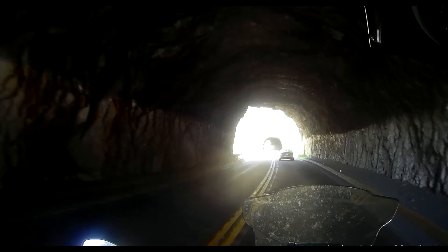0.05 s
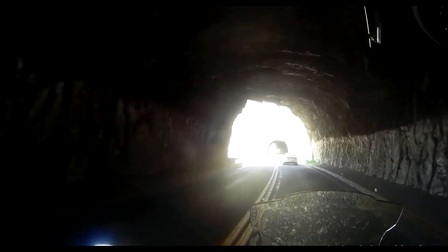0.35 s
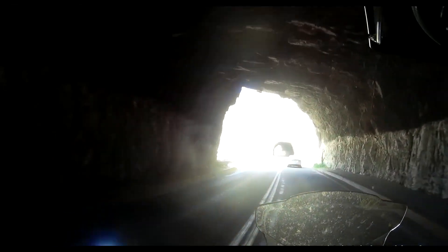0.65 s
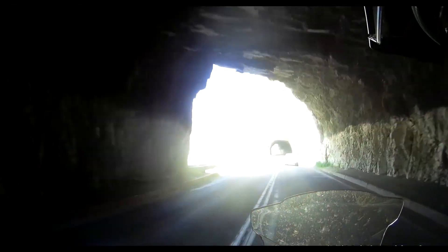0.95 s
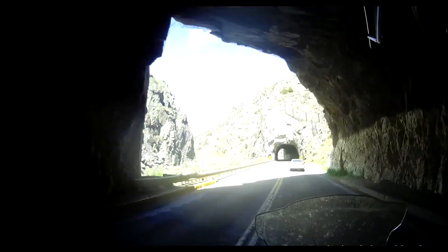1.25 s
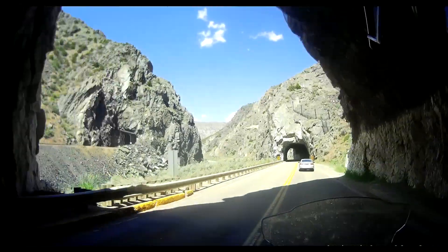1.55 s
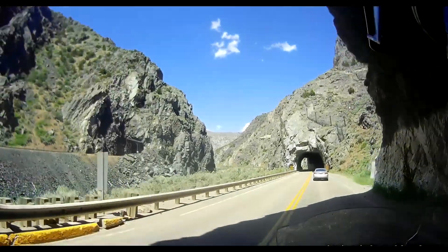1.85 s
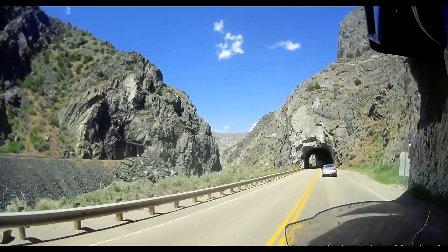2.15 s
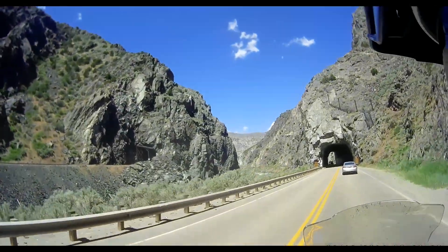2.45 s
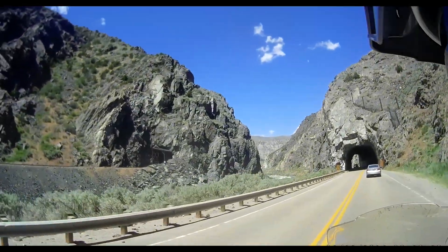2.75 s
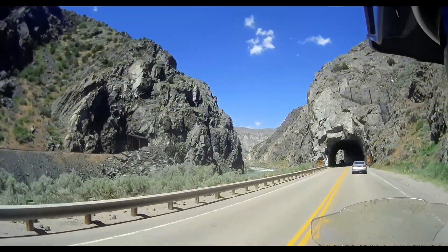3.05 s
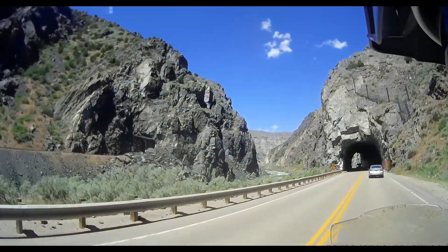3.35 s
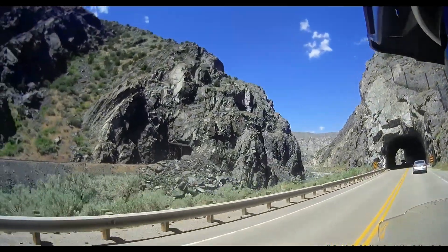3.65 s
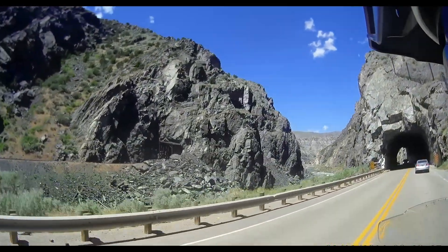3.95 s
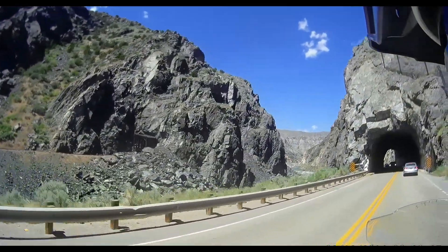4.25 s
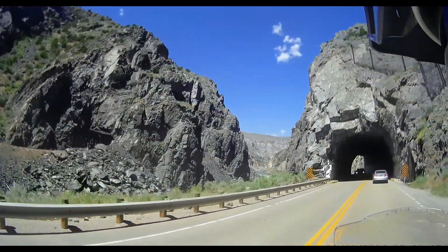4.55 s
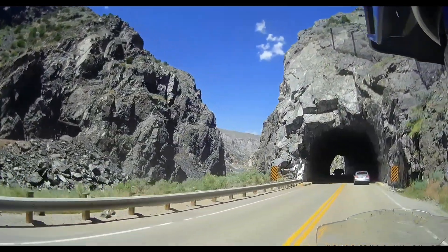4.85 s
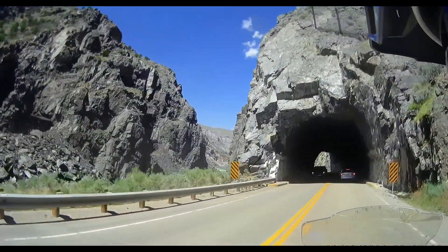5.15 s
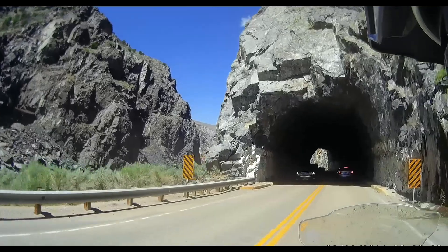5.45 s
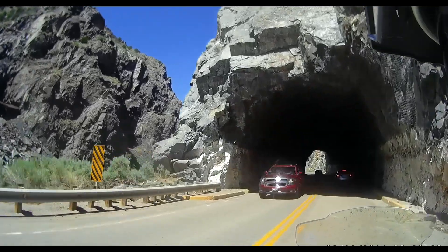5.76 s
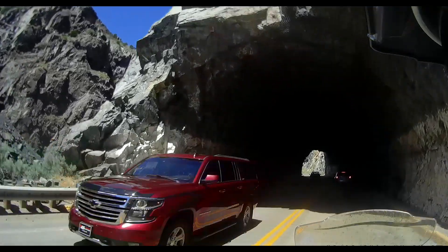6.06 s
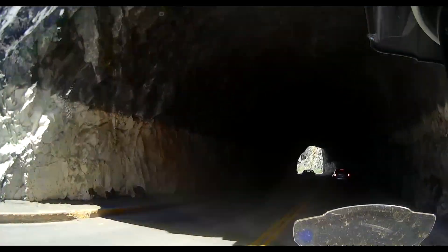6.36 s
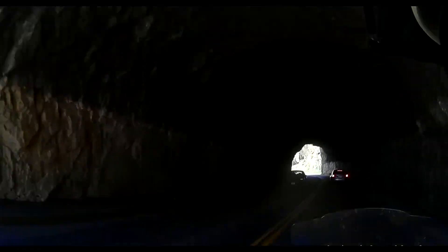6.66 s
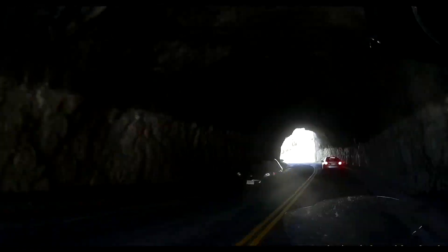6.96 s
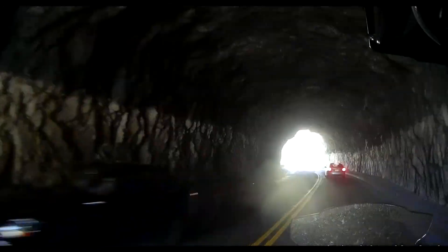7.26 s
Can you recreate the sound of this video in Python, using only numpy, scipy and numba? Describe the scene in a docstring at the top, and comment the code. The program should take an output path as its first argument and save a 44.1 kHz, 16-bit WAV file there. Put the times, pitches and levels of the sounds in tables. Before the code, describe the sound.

Strong wind buffets a microphone on a motorcycle travelling a canyon road between two rock tunnels, for about seven and a half seconds. Low, steady tyre and engine rumble lies beneath it. In the first second, booming gusts alternate with brief lulls, under an airy hiss and a very faint high whistle from about 0.5 to 1 second. From 1.2 to 2.4 seconds the wind flutters raggedly, with quick tearing slaps. It eases slightly, then gusts hard from 3 to 4.5 seconds, with a trace of whistle near 3.1. Sharp slaps of air stand out around 4.5, 5.3 and 6.1 seconds, the last thrown by an oncoming car. The hiss repeatedly builds and breaks off, notably between 6 and 6.6 seconds. The hardest blasts overload the microphone and briefly choke the hiss. After a short lull, another gust hits just after 7 seconds.

```python
"""A canyon road between two rock tunnels, heard from a microphone riding on a motorcycle.
Turbulent eddies of all sizes buffet the microphone in gusts and lulls, and single vortices slap
across its port. Air shearing round the housing hisses in surges and draws a faint whistle from an edge.
Tyre and engine rumble lie beneath. The strongest pressure swings overload the input and pull
its gain down, which chokes the hiss."""
import sys
import numpy as np
from scipy import signal
from scipy.fft import rfft, irfft, next_fast_len
from scipy.io import wavfile
from scipy.ndimage import map_coordinates
from numba import njit

SR = 44100
rng = np.random.default_rng(int(sys.argv[2]) if len(sys.argv) > 2 else 0)


def dump(signal):
    """Clip the signal to [-1, 1] and save it as 16-bit WAV at the path in sys.argv[1]."""
    limited = np.clip(np.atleast_2d(signal).T, -1, 1)
    pcm = np.round(limited * 32767).astype(np.int16)
    wavfile.write(sys.argv[1], SR, pcm)


N = 322812

# Noise spectra. Each row: frequency in Hz, relative spectral density in dB.
ROAD_SPECTRUM = [(30, 9), (100, 8), (250, -13), (500, -6.5), (1000, -30), (2800, -47), (4000, -57),
                 (12000, -50)]
FIZZ_SPECTRUM = [(300, 3), (2000, 1), (5600, -11), (11000, -7), (15000, -22)]
HISS_SPECTRUM = [(100, -24), (400, 6), (850, -3.5), (1200, -1.5), (1600, -7), (2200, -9), (2900, -14),
                 (3600, -17), (5200, -19.5), (5700, -22), (7000, -23), (8000, -28), (12500, -30.5),
                 (14500, -44)]
BUFFET_SPECTRUM = [(5, -7), (14, -3.5), (24, 0), (36, -1.5), (55, -5.5), (80, -15.5), (140, -26),
                   (600, -110)]  # the largest eddies
SWIRL_SPECTRUM = [(30, -15.5), (65, 3.5), (110, -0.5), (170, -5), (240, -11), (350, -24.5), (700, -36.5),
                  (2000, -82)]  # middle-sized, booming eddies
FLUTTER_SPECTRUM = [(90, -32), (200, 2.5), (280, 0), (380, -4.5), (550, -15), (800, -24), (1500, -36.5),
                    (4000, -75)]  # small, ragged eddies
RASP_SPECTRUM = [(400, 2), (1100, -2), (2000, -6), (3000, -8), (4000, -22), (7000, -25), (13000, -34)]  # eddies tearing at the port
TEAR_SPECTRUM = [(200, 8), (420, 10), (650, 11), (1000, -15), (1400, -12.5), (3000, -21), (5000, -35),
                 (10000, -50)]
CRACK_SPECTRUM = [(400, -14), (750, 0), (1050, 2), (1500, -14), (2800, -18), (5000, -32.5), (10000, -40)]

# Edge tones of the housing. Each row: onset in seconds, hold in seconds, pitch in Hz, level in dB.
EDGE_TONES = [(0.446, 0.61, 4640, -64), (3.065, .045, 4660, -57), (3.09, 0.0175, 6750, -61)]
# Air cavities of the housing. Each row: resonant frequency in Hz, width in Hz, lift in dB.
CAVITIES = [(1210, 32, 2), (2890, 150, 4), (4100, 350, -2), (4510, 380, 2), (6650, 350, 1), (9800, 1200, 3)]
# Air rushing round the housing, strongest in the first tunnel and at the mouth of the second.
# Each row: time in seconds, relative level in dB.
AIR_RUSH = [(0, -43.5), (.17, -54), (.3, -46), (.62, -43), (1.1, -45), (1.65, -51.5), (2.1, -50),
            (2.4, -54.5), (2.85, -54), (3.06, -46), (3.27, -52), (3.55, -52), (4.25, -56.5), (5.05, -52.5),
            (5.3, -49), (5.7, -53), (6.05, -48.5), (6.72, -56.5), (7.32, -50)]
# Hiss that builds and breaks off. Each row: break in seconds, build time in seconds, relative level in dB.
HISS_SURGES = [(.07, 0.033, -56), (1.57, 0.22, -47.5), (2.03, 0.42, -51.5), (3.17, 0.16, -47),
               (3.83, 0.52, -49.5), (4.129, 0.31, -49.5), (4.49, 0.28, -50), (4.78, 0.34, -52),
               (4.919, 0.2, -49.5), (6.11, 0.29, -48), (6.383, 0.29, -45.5), (6.555, 0.12, -48.5),
               (7.15, 0.3, -55)]
# Abrupt drops of the hiss. Each row: onset in seconds, hold in seconds, depth in dB.
HISS_DIPS = [(1.1, .025, 4), (1.577, 0.016, 10), (2.03, 0.024, 7), (2.31, .02, 2), (2.35, .014, 11),
             (3.19, .02, 6), (3.267, 0.049, 2.5), (3.845, 0.026, 3), (4.125, 0.012, 11), (4.514, 0.052, 2),
             (4.777, 0.0071, 16), (4.94, 0.031, 5), (5.04, .018, 6), (5.148, .022, 4.5), (5.233, .005, 13),
             (5.355, .04, 1.5), (5.69, 0.039, 3), (6.385, 0.022, 5), (6.57, 0.018, 4), (6.677, 0.037, 5),
             (6.799, 0.014, 12)]
# Moments of smooth flow. Each row: onset in seconds, hold in seconds, relative depth in dB.
FLOW_LULLS = [(0.15, 0.11, 13.5), (0.442, 0.21, 6), (0.775, 0.026, 10), (0.914, 0.025, 18),
              (1.122, 0.057, 13.5), (1.525, .025, 7.5), (2.61, 0.036, 1), (2.881, 0.08, 9.5),
              (4.237, 0.065, 7), (4.523, 0.16, 2), (4.807, 0.059, 5), (5.004, 0.066, 8.5),
              (5.16, 0.072, 12.5), (5.737, 0.05, 6), (6.138, 0.027, 5.5), (6.705, 0.09, 6.5),
              (6.899, 0.12, 9.5)]
# Gusts of churned air. Each row: onset in seconds, hold in seconds, relative flutter and boom in dB.
AIR_GUSTS = [(0.042, 0.089, -27, -18.5), (0.318, 0.09, -20, -19), (0.689, 0.076, -20, -22),
             (0.824, 0.067, -29, -16), (1.183, 0.21, -20, -19.5), (1.43, 0.025, -31, -40),
             (1.556, 0.088, -31, -21), (1.684, 0.02, -22, -17), (1.85, 0.13, -23.5, -38),
             (2.07, 0.058, -24.5, -37), (2.139, 0.06, -21, -23), (2.243, 0.029, -22.5, -35),
             (2.335, 0.1, -25, -23), (2.712, 0.11, -34, -25), (2.976, 0.29, -27, -21),
             (3.317, 0.054, -18.5, -20), (3.398, 0.17, -19.5, -18), (3.598, 0.03, -27, -17.5),
             (3.773, 0.12, -22, -21.5), (3.942, 0.12, -29, -21.5), (4.057, 0.16, -25, -22.5),
             (4.415, 0.09, -24.5, -17), (4.74, 0.032, -29, -25), (4.867, 0.046, -26, -24.5),
             (5.104, 0.038, -30, -20), (5.285, 0.026, -28, -22), (5.82, 0.11, -28, -20.5),
             (5.913, 0.043, -20, -17), (5.99, 0.1, -26, -18), (6.246, 0.15, -21.5, -21),
             (6.37, 0.1, -43, -38), (6.467, 0.077, -24, -19), (6.595, 0.029, -21, -34),
             (7.048, 0.21, -18, -18.5)]
# Vortices that strike the port, the one at 6.1 s thrown by an oncoming car. Each row: time in seconds,
# swing level in dB, swing frequency in Hz, crossing time in seconds, level of the tearing edge in dB.
VORTICES = [(.062, -11, 198, 0.0067, -29), (.104, -16, 300, .004, -28), (.351, -12, 130.8, .011, -40),
            (.392, -19, 269, 0.0055, -30), (.746, -18, 388, 0.0036, -28), (.83, -10, 255, .0098, -34),
            (1.024, -18, 380, 0.0045, -23), (1.086, -10.5, 348.4, .0035, -16.5),
            (1.292, -13, 278.6, 0.0046, -40), (1.381, -14.5, 328, 0.0052, -34),
            (1.562, -12.5, 329, 0.0039, -17), (1.619, -10.5, 261, .005, -27), (1.702, -9, 276.6, .005, -24),
            (1.79, -19.5, 433, 0.0044, -29), (1.848, -13.5, 428, 0.0065, -29),
            (1.908, -21, 320, 0.0045, -23), (2.019, -12, 292.6, 0.0086, -19.5),
            (2.271, -11, 303, 0.0034, -25), (2.375, -12.5, 298.5, 0.0034, -22),
            (2.753, -13.5, 303, 0.0036, -41), (3.112, -12, 370, 0.0045, -31),
            (3.148, -8.5, 269.3, 0.0073, -21), (3.162, -8.5, 342.2, .0064, -22),
            (3.22, -20, 277, 0.0022, -17), (3.323, -7.5, 233.2, 0.0057, -22), (3.392, -11, 347, .004, -29),
            (3.457, -15, 423, 0.0054, -28), (3.482, -10.5, 350.4, 0.0037, -24),
            (3.537, -11, 319.3, 0.0062, -23), (3.607, -6, 260.5, 0.0047, -27), (3.782, -9, 267, .009, -26),
            (3.825, -9.5, 337.5, 0.0057, -21), (3.947, -6.5, 268, 0.0087, -29),
            (4.0, -17, 403, 0.0036, -24), (4.078, -18, 359, 0.0035, -27), (4.11, -18, 330, 0.0043, -23),
            (4.428, -8, 312, 0.0033, -26), (4.443, -12, 261, .006, -21), (4.466, -7.5, 269, 0.0052, -21),
            (4.477, -2.5, 119.5, 0.0084, -21), (4.525, -20, 448, 0.004, -26),
            (4.868, -10.5, 407, 0.0035, -31), (5.342, 1.5, 199.6, 0.0051, -25), (5.4, -9, 273, .003, -23),
            (5.444, -16, 380, .004, -25), (5.493, -3.5, 138.7, 0.011, -26),
            (5.843, -10.5, 238, 0.0084, -40), (6.094, -2.5, 318, 0.0099, -26),
            (6.294, -5.5, 255.5, .0061, -24), (6.329, -12, 277.4, .005, -29),
            (6.523, -10.5, 372.7, .004, -26), (6.543, -9.5, 305.5, .0048, -24),
            (6.656, -11, 301, .004, -25), (6.786, -11, 299.7, 0.003, -25),
            (7.127, -8.5, 269, 0.0045, -18.5), (7.184, -16, 333, 0.0062, -34)]


def amp(db):
    """Amplitude ratio of a level in decibels."""
    return 10 ** (np.asarray(db) / 20)


def unit_rms(x):
    """The signal scaled to rms 1."""
    return x / np.sqrt(np.mean(x ** 2) + 1e-20)


def wobble(rate):
    """A smooth random curve through rate knots a second."""
    return map_coordinates(rng.standard_normal(N // 8), [np.arange(N) * rate / SR], mode="wrap")


def swell(onset_s, hold_s, rise_s, fall_s):
    """A trapezoidal envelope that reaches 1 at the onset, holds and falls."""
    t = np.arange(N) / SR - onset_s
    return np.clip(np.minimum(1 + t / rise_s, 1 + (hold_s - t) / fall_s), 0, 1)


def filtered(x, response):
    """Linear filtering: the spectrum is multiplied by a frequency response."""
    size = next_fast_len(N + SR // 2)
    return irfft(rfft(x, size) * response(np.fft.rfftfreq(size, 1 / SR)), size)[:N]


def noise(spectrum):
    """White noise filtered to the given spectrum, at rms 1."""
    knots_hz, db = np.transpose(spectrum)
    white = rng.standard_normal(N)
    return unit_rms(filtered(white, lambda hz: amp(np.interp(np.log(hz + 1), np.log(knots_hz), db))))


def steadied(x, span_s):
    """Division by the running rms removes swells longer than span_s."""
    window = np.hanning(max(int(span_s * SR), 3))
    power = signal.fftconvolve(x ** 2, window / window.sum(), "same")
    return x / np.sqrt(np.abs(power) + 1e-9)


def road_rumble():
    """Tyres and engine radiate steady noise, mostly at low frequencies."""
    return amp(-42) * noise(ROAD_SPECTRUM)


def edge_whistle(width_hz, waver_hz):
    """Edge tone: fast air makes an edge of the housing sing in a narrow, wavering band of noise."""
    t = np.arange(N) / SR
    drift_cycles = np.cumsum(waver_hz * wobble(14)) / SR
    breath = unit_rms(wobble(width_hz)) + 1j * unit_rms(wobble(width_hz))
    whistle = np.zeros(N)
    for onset, hold, hz, db in EDGE_TONES:
        tone = np.real(breath * np.exp(2j * np.pi * (hz * t + drift_cycles)))
        whistle += amp(db) * swell(onset, hold, rise_s=0.14, fall_s=0.03) * tone
    return whistle


def cavity_response(hz):
    """Resonance: each cavity of the housing lifts a band about its natural frequency."""
    return amp(sum(db / (1 + (2 * (hz - centre) / width) ** 2) for centre, width, db in CAVITIES))


def hiss_flicker(rate, build_s):
    """The hiss flickers in a random sawtooth, building slowly and dropping abruptly."""
    drops = 1. * (rng.random(N) < rate / SR)  # on average rate times a second
    teeth = signal.lfilter([1], [1, -np.exp(-1 / (build_s * SR))], drops[::-1])[::-1]
    return unit_rms(teeth - teeth.mean())


def shear_hiss(turbulence):
    """Air shearing round the housing makes broadband noise; rush and surges add in power."""
    air = unit_rms(filtered(noise(HISS_SPECTRUM), cavity_response))
    flicker_db = 0.9 * turbulence + 1.22 * wobble(260) + 0.9 * hiss_flicker(rate=69, build_s=0.018)
    flicker = steadied(amp(flicker_db), span_s=0.16)
    rush = amp(np.interp(np.arange(N) / SR, *np.transpose(AIR_RUSH)))
    surges = sum(amp(db) * swell(at, 0, build, fall_s=0.008) for at, build, db in HISS_SURGES)
    dip_db = sum(db * swell(onset, hold, 0.0096, 0.0096) for onset, hold, db in HISS_DIPS)
    return amp(11.5 - dip_db) * np.hypot(rush, surges) * flicker * air


def gusts():
    """Gusts stir small and larger eddies: two envelopes, each following the strongest gust present."""
    envelopes = [amp([[flutter_db], [boom_db]]) * swell(onset, hold, rise_s=0.013, fall_s=0.025)
                 for onset, hold, flutter_db, boom_db in AIR_GUSTS]
    return np.max(envelopes, axis=0)


def eddies(spectrum, turbulence, burst_db, span_s):
    """Intermittency: turbulence bunches the pressure of one size of eddy into bursts."""
    return steadied(noise(spectrum) * amp(burst_db * turbulence), span_s)


def buffeting(turbulence):
    """Passing eddies make the pressure fluctuate; the larger the eddy, the lower its frequency."""
    flutter_gust, boom_gust = gusts()
    calm_db = sum(db * swell(onset, hold, 0.012, 0.012) for onset, hold, db in FLOW_LULLS)

    def strength(gust, steady_db, gust_db, lull_share):
        """A steady part, which sinks in the lulls, adds in power to the gusts."""
        return np.hypot(amp(steady_db - lull_share * calm_db), amp(gust_db) * gust)

    buffet = strength(boom_gust, steady_db=-10.5, gust_db=-19, lull_share=0.31)
    swirl = strength(boom_gust, steady_db=-14, gust_db=6.5, lull_share=0.91)
    flutter = strength(flutter_gust, steady_db=-29.5, gust_db=-4.5, lull_share=0.91)
    rasp = strength(flutter_gust, steady_db=-46.5, gust_db=-23.5, lull_share=0.98)
    return (buffet * eddies(BUFFET_SPECTRUM, turbulence, burst_db=1, span_s=0.173)
            + swirl * eddies(SWIRL_SPECTRUM, turbulence, burst_db=5, span_s=0.15)
            + flutter * eddies(FLUTTER_SPECTRUM, turbulence, burst_db=3, span_s=0.075)
            + rasp * eddies(RASP_SPECTRUM, turbulence, burst_db=2.5, span_s=0.073))


def vortex_slaps(size_spread, crackle_db, raggedness):
    """A vortex crossing the port gives a pressure transient with a tearing edge; the strongest crack."""
    t = np.arange(-SR // 20, SR // 20) / SR
    swings, edges, cracks = np.zeros((3, N + SR))
    draws = rng.standard_normal(size=(len(VORTICES), 48))
    for (at, db, swing_hz, crossing_s, tear_db), (size, phase, *jitter) in zip(VORTICES, draws):
        width_s = crossing_s * np.exp(size_spread * size)  # a bigger vortex takes longer to cross
        core = 1 / (1 + (t / width_s) ** 2) ** 2
        waver = np.interp(t, np.linspace(t[0], t[-1], len(jitter)), jitter)
        cycles = np.cumsum(swing_hz * (1 + raggedness * waver)) / SR
        start = max(round(at * SR) - len(t) // 2, 0)
        passage = slice(start, start + len(t))
        swings[passage] += amp(db) * core * np.sin(2 * np.pi * (cycles + phase))
        edges[passage] += amp(tear_db) * core
        cracks[passage] += amp(-24 + 1.67 * db) * core  # the crack grows faster than the swing
    tearing = steadied(noise(TEAR_SPECTRUM) * amp(crackle_db * wobble(900)), span_s=0.01)
    cracking = steadied(noise(CRACK_SPECTRUM) * amp(crackle_db * wobble(900)), span_s=0.0089)
    return swings[:N] + edges[:N] * tearing + cracks[:N] * cracking


def scene():
    """Superposition: wind and road noise add at the microphone; one turbulence drives eddies and hiss."""
    turbulence = unit_rms(0.6 * wobble(24) + wobble(65) + 0.47 * wobble(150))
    turbulence = np.minimum(turbulence, 1.3)  # bursts level off, troughs go deep
    pressure = (buffeting(turbulence)
                + vortex_slaps(size_spread=0.12, crackle_db=4.5, raggedness=0.222)
                + shear_hiss(turbulence)
                + edge_whistle(width_hz=180, waver_hz=30)
                + road_rumble())
    return pressure[None]


@njit
def follow(x, attack_s, release_s):
    """A first-order lag with separate time constants for rise and fall."""
    envelope = np.zeros(len(x))
    for i in range(1, len(x)):
        gap = x[i] - envelope[i - 1]
        lag_s = attack_s if gap > 0 else release_s
        envelope[i] = envelope[i - 1] + gap / (lag_s * SR)
    return envelope


def gain_control(x, threshold, duck_db, attack_s, release_s):
    """Compression with lag: an overload lowers the gain, too late to stop it; the gain then creeps back."""
    overload = 1. * (np.abs(x) > threshold)
    return x * amp(-duck_db * follow(overload, attack_s, release_s))


def record(dry):
    """Saturation: big swings flatten; a faint fizz runs steadily beneath and alone fills the flattened
    instants; a low-pass follows."""
    ceiling, cutoff_hz, fade_s = 0.5, 14583, 0.004
    ducked = gain_control(dry[0], threshold=0.51, duck_db=4.5, attack_s=0.022, release_s=0.06)
    fizz = amp(-70) * noise(FIZZ_SPECTRUM)
    saturated = np.clip(ducked, -ceiling, ceiling) + fizz
    faded = saturated * swell(fade_s, N / SR - 2 * fade_s, fade_s, fade_s)
    return filtered(faded, lambda hz: 1 / np.sqrt(1 + (hz / cutoff_hz) ** 200))[None]


dry = scene()
out = record(dry)
dump(out)
```